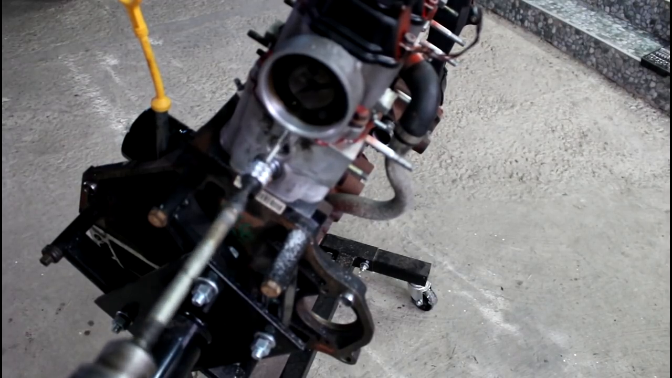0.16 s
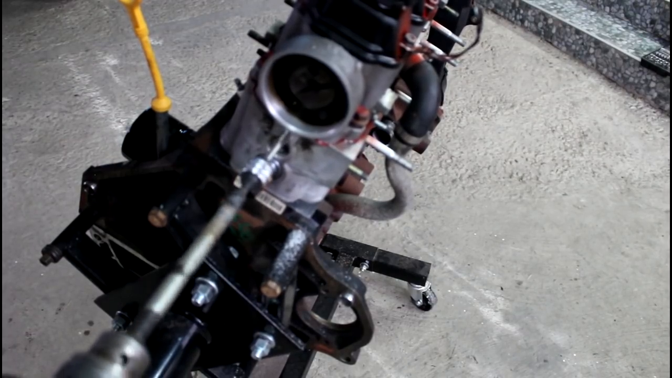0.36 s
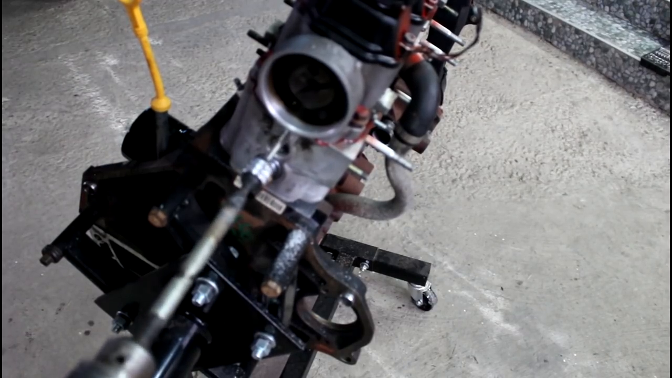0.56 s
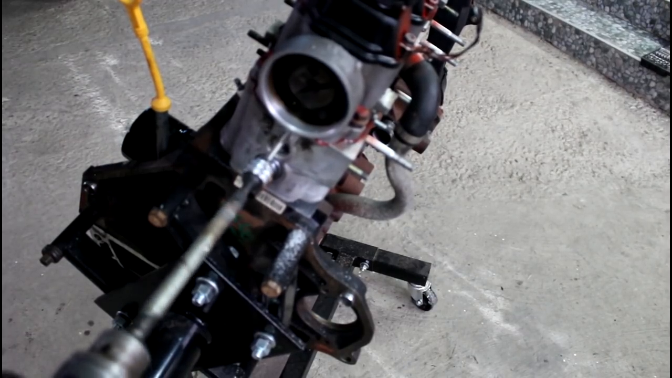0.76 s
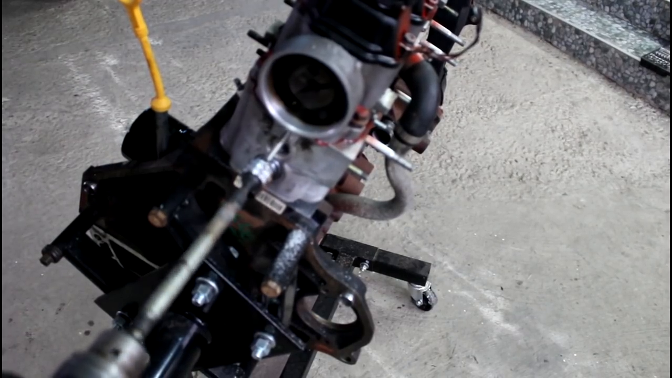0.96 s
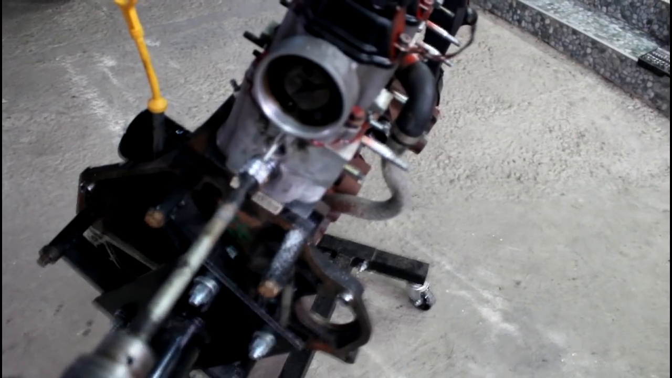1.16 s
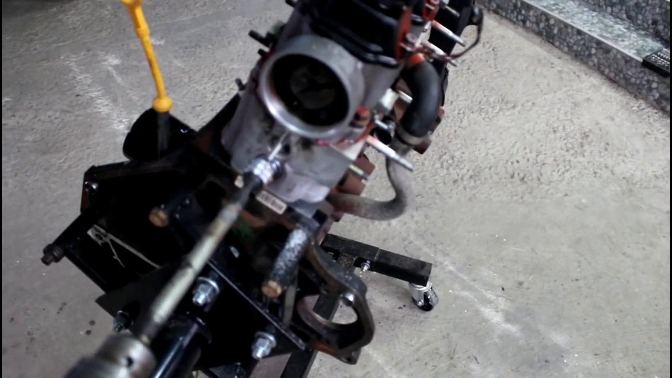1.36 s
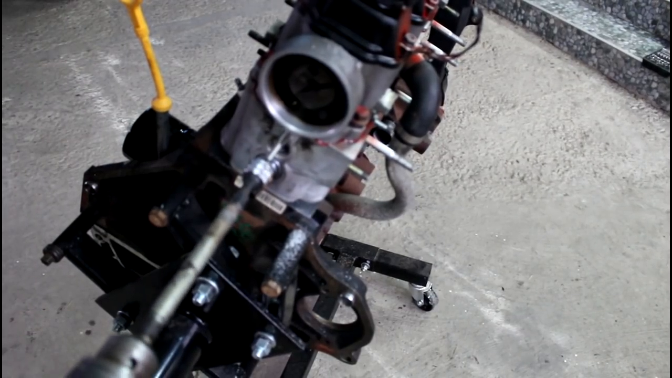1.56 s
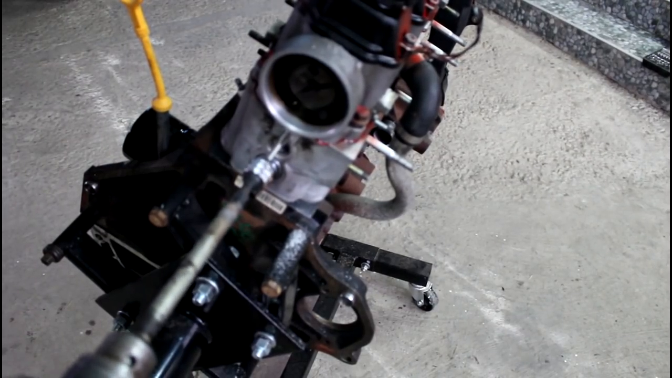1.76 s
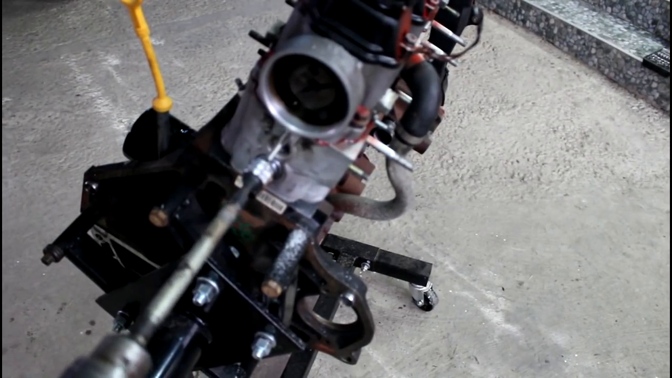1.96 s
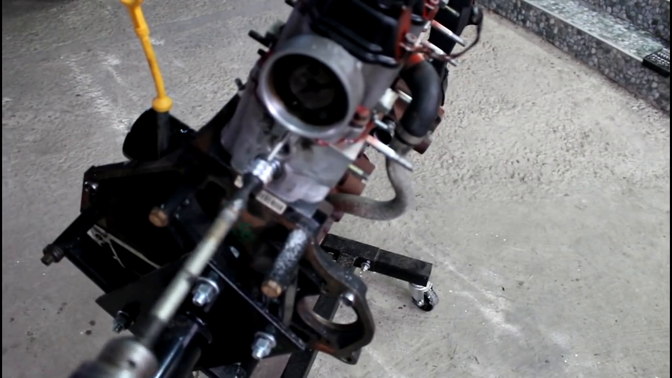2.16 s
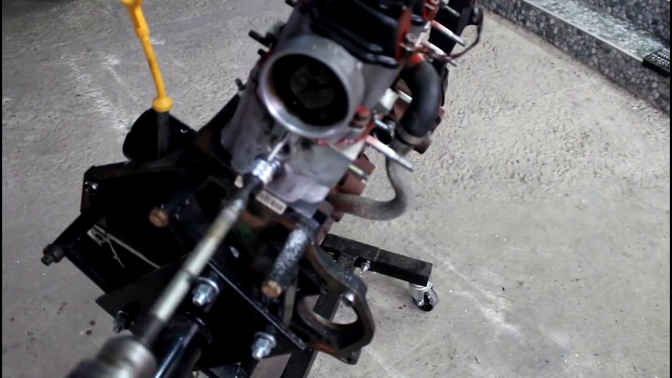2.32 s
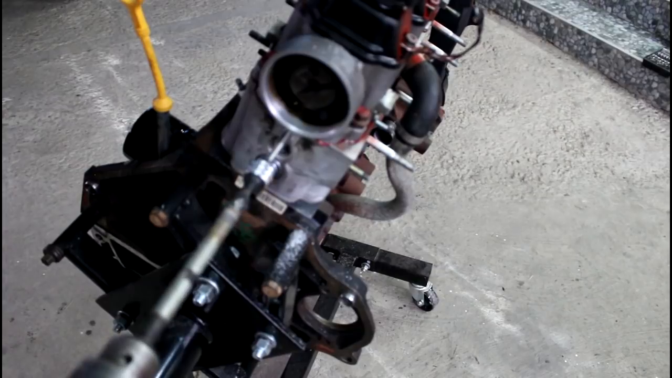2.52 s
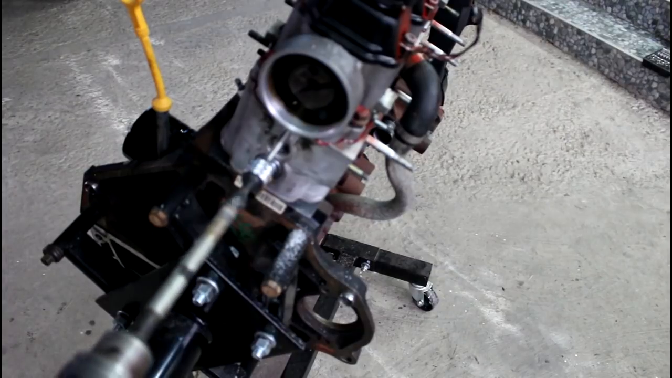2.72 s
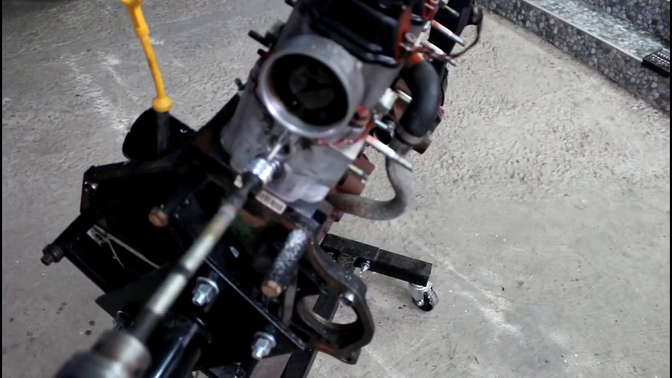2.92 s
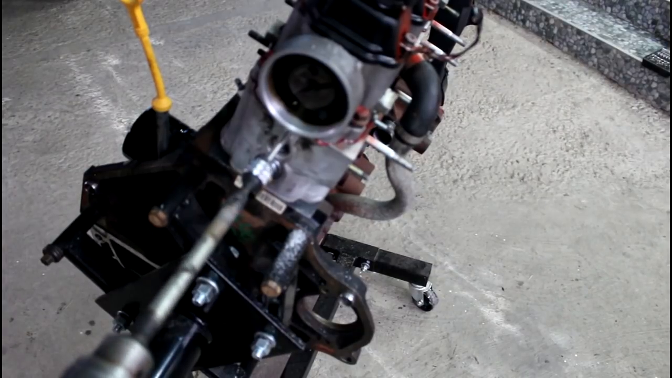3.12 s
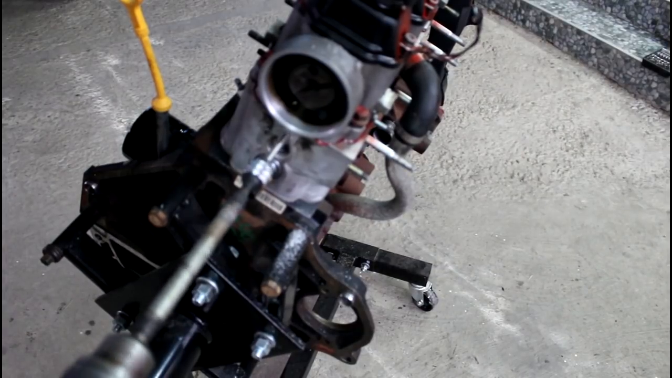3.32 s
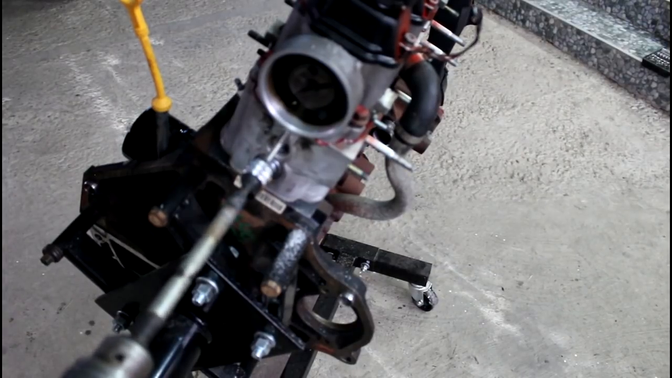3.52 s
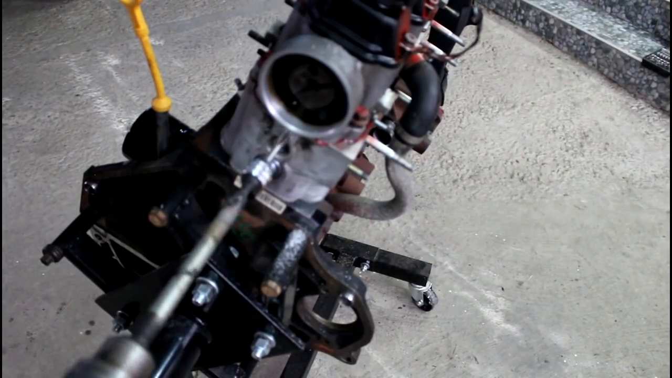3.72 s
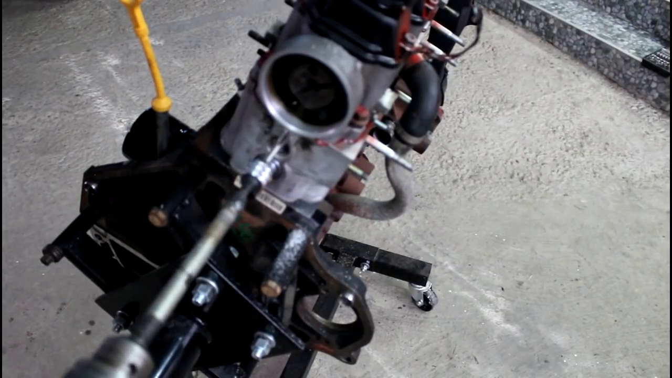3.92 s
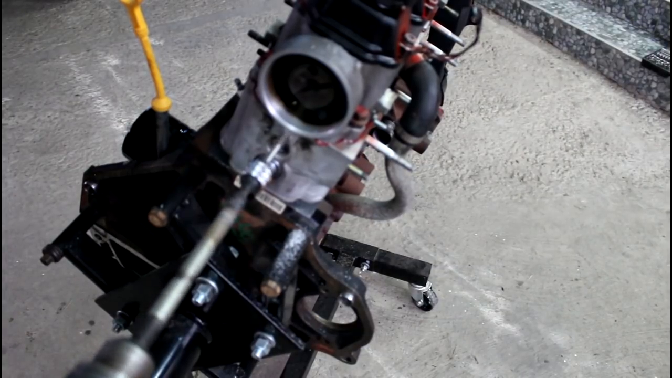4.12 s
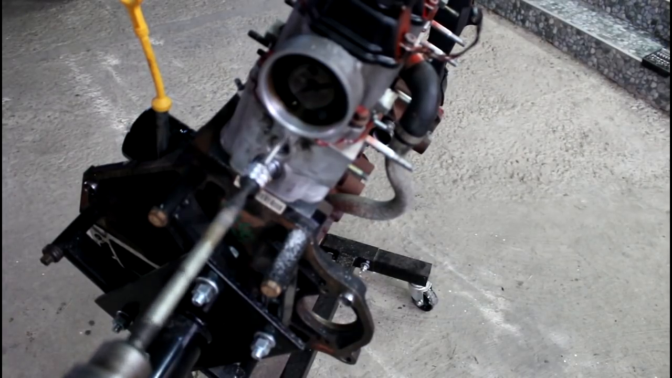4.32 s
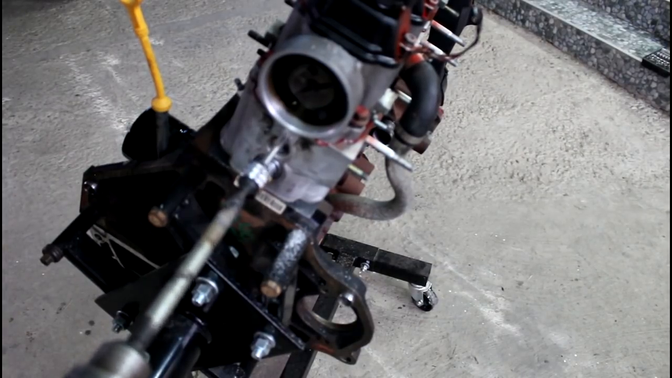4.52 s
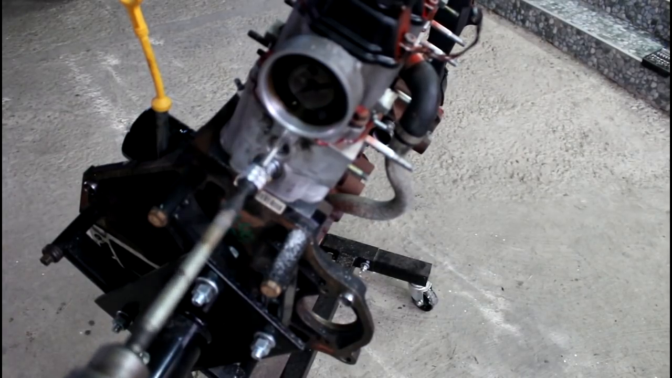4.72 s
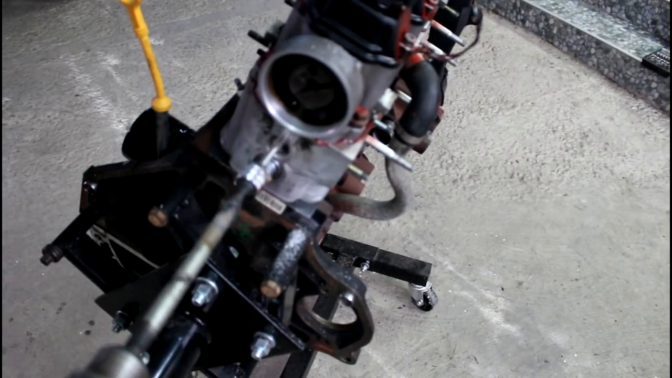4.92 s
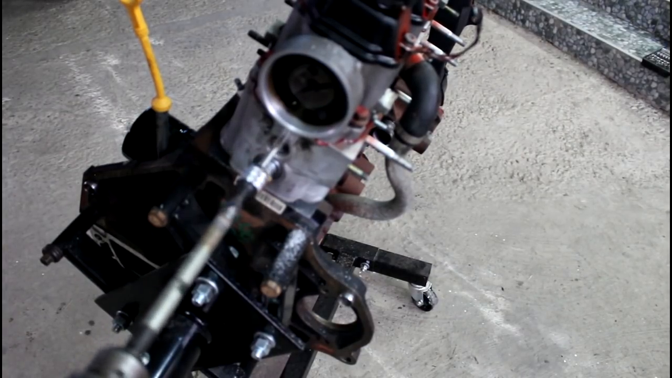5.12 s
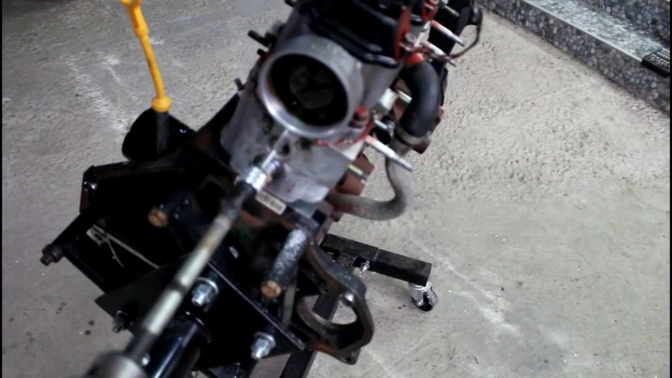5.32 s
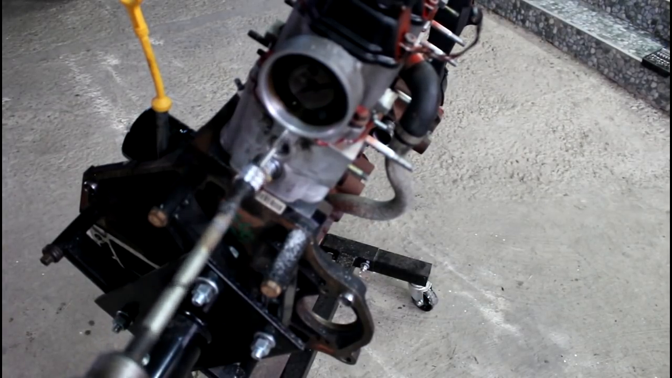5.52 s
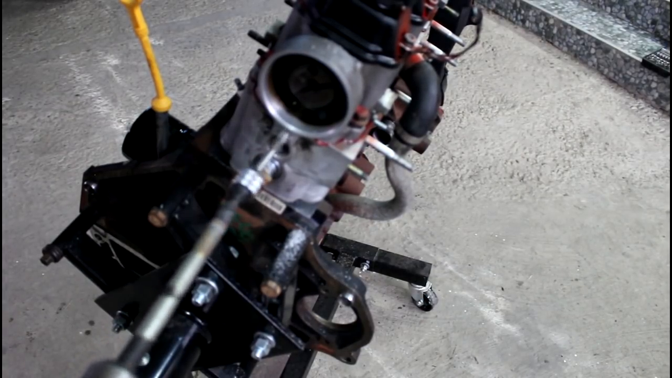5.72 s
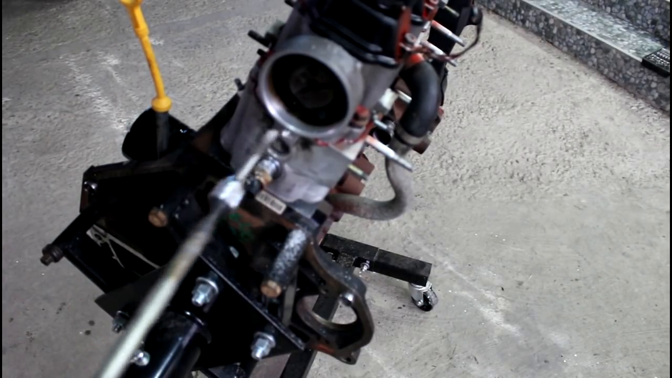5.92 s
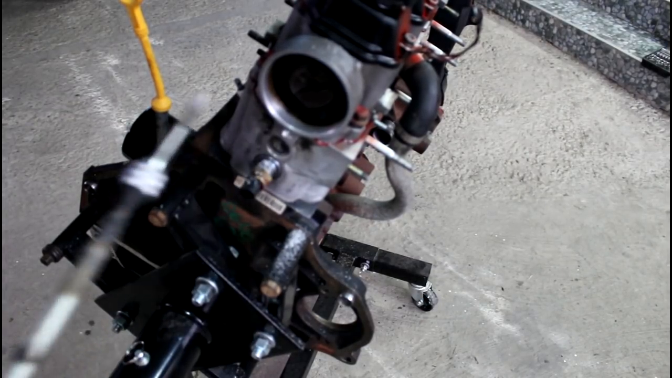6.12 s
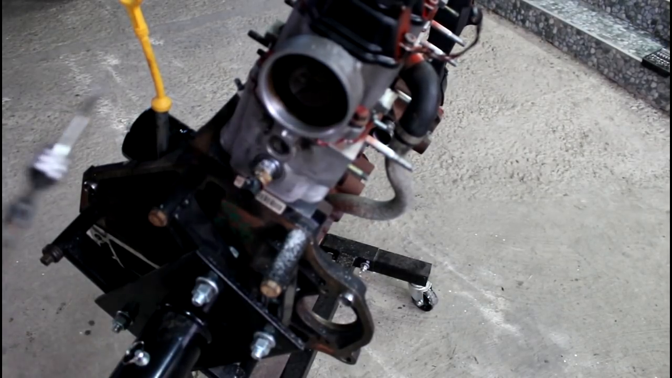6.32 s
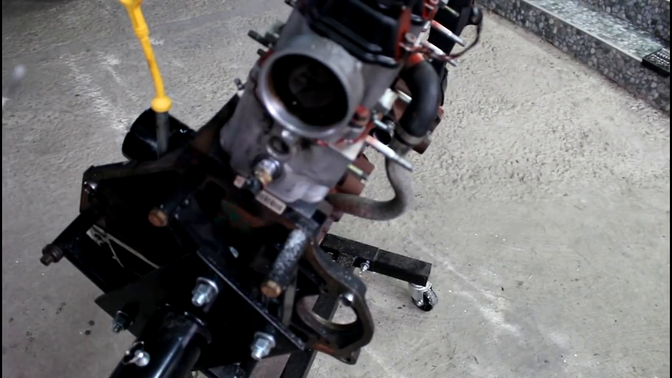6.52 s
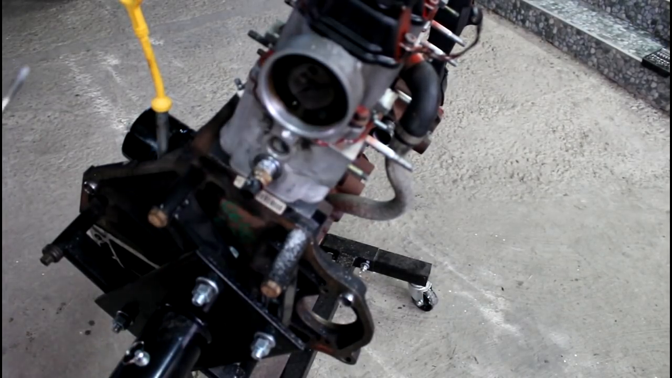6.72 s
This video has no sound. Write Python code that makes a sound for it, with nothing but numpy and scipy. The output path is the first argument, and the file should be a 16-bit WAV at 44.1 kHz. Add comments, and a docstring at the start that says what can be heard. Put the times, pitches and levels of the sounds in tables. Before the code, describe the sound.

Stuttering drill pulls rattle, scrape and clank against metal in an echoing workshop, ending in two long whining run-downs over faint low hum.

```python
"""Power drill driving a tap

A power drill runs a tap into an engine casting through a long socket extension, over a concrete workshop floor.
Most pulls of the trigger take up the slack with a knock; the motor then spins up and runs down again.
Timed clicks and friction noise make the rattle and scrape, multiples of the beat rate make the whine.
Short loaded bursts give way to longer free runs. Struck metal rings, and a low hum wanders behind it all.
"""
import sys
import numpy as np
from scipy import signal
from scipy.fft import rfft, irfft, next_fast_len
from scipy.io import wavfile
from scipy.ndimage import uniform_filter1d

SR = 44100
rng = np.random.default_rng(int(sys.argv[2]) if len(sys.argv) > 2 else 0)


def dump(signal):
    """Clip the signal to [-1, 1] and save it as 16-bit WAV at the path in sys.argv[1]."""
    limited = np.clip(np.atleast_2d(signal).T, -1, 1)
    pcm = np.round(limited * 32767).astype(np.int16)
    wavfile.write(sys.argv[1], SR, pcm)


N = 302947
TIME = np.arange(N) / SR

# Pulls of the trigger. Each row: start in seconds, spin-up in seconds, run-down in seconds,
# top speed in beats per second, time to half speed under drag alone in seconds,
# basic level at top speed in dB, basic growl and basic scrape in dB against the middle band.
TRIGGER_PULLS = [(-.03, .03, .13, 226, .013, -17, -1, -11), (.244, 0.12, 0.069, 760, .2, -14.5, 2.5, -18),
                 (.676, 0.041, 0.16, 313, 0.19, -17, 0, -15),
                 (.98, .033, 0.25, 216, .03, -19.5, -1.5, -9.5),
                 (2.036, .074, 0.079, 280, 0.14, -16, -2, -14),
                 (2.394, .033, 0.089, 212, .2, -20, -3, -12.5),
                 (2.794, 0.031, .18, 153, .025, -21.5, -2, -11.5),
                 (3.056, .124, 0.052, 174, .15, -20, -3.5, -10.5),
                 (3.305, .115, .21, 266, .035, -19, -6, -9.5), (3.765, 0.11, .1, 213, .12, -24, -7, -9.5),
                 (4.11, 0.17, .36, 520, .15, -19, -3.5, -9.5), (4.555, .13, .7, 395, .26, -22.5, 1.5, -10),
                 (5.51, .14, .86, 275, 0.31, -23, -2, -12)]
# Moments when the drive binds and grinds louder. Each row: centre in seconds, half width in seconds, lift in dB.
BINDS = [(.3, 0.026, 3.5), (.41, 0.0098, 4), (1.14, 0.027, 6.5), (3.58, 0.026, 9), (3.86, 0.038, 6),
         (4.175, 0.025, 6.5), (4.33, 0.014, 5), (4.46, .025, 5), (4.71, 0.048, 6.5), (5.035, .02, 8),
         (5.76, .02, 6.5), (5.98, 0.031, 3.5)]
# Rattle colour with the tap cutting. Each row: frequency in Hz, density in dB per Hz.
CUTTING_COLOUR = [(88, -82), (150, -37.5), (259, -11.5), (327, -14), (533, -1.5), (729, -3.5), (904, 4.5),
                  (1140, 2), (1690, 4), (2310, -0.5), (3540, -4.5), (5770, -14), (6880, -21.5),
                  (7890, -19.5), (15900, -50)]
# Rattle colour with the tap running free. Each row: frequency in Hz, density in dB per Hz.
RUNNING_COLOUR = [(88, -43), (150, -22.5), (354, -9.5), (439, -14), (484, -2), (612, 7), (701, -7),
                  (886, -1.5), (1470, 1.5), (2310, -1.5), (2750, -3.5), (5440, -14.5), (6620, -19),
                  (9220, -24.5), (15900, -48.5)]
# Resonances of the gear case. Each row: frequency in Hz, width in Hz, lift in dB.
CASE_RESONANCES = [(609.2, 92, -3.5), (877, 210, 6), (1460, 32, 4.5), (2724, 120, 6.5), (3398.4, 500, 6),
                   (4740, 290, 3), (6509, 662, 8), (7820, 490, 5.5), (9160, 410, 3.5)]
# How the gear case radiates the whine. Each row: frequency in Hz, relative level in dB.
WHINE_RADIATION = [(250, -30), (420, -14), (560, 0), (750, -1), (950, 1), (1100, -1), (1400, 1), (1800, -7),
                   (2700, -10), (3550, -9), (5000, -26)]
# The faster the gears turn, the more they sing. Each row: speed in beats per second,
# basic whine level in dB against the rattle.
GEAR_SINGING = [(100, -22), (180, -9), (260, -2.5), (400, 0), (500, 2), (700, 3)]
# Knocks of the socket and tap. Each row: time in seconds, relative level in dB,
# relative weight of the low band in dB, relative weight of the high band in dB.
KNOCKS = [(0.086, -13.5, -19, -24.5), (0.235, -8, -20, -20), (0.261, -6, -21, -28), (0.675, -3, -21, -21.5),
          (0.697, -7, -31, -26), (0.98, -10.5, -29, -19), (1.005, -2, -20, -24), (1.118, -8, -6, -21.5),
          (1.27, -10.5, -25, -23.5), (1.293, -17, -8, -32), (1.527, -9.5, -22, -17), (1.688, -18, -5, -7),
          (1.696, -14.5, -12, -17), (1.721, -21.5, -10, -14), (1.843, -22.5, -15, -43), (2.038, 2, -9, -18),
          (2.175, -8.5, 3, -20), (2.396, 2.5, -18, -23.5), (2.476, -2, -4, -27), (2.498, -5.5, -27, -21.5),
          (2.635, -16.5, -28, -22.5), (2.795, 2.5, 2, -24.5), (2.841, -14, -22, -22),
          (2.962, -12.5, -10, -24), (3.057, 0, -15, -20), (3.297, 3, -20, -25), (3.305, -11.5, -33, -9),
          (3.719, -3.5, -12.5, -21), (4.097, -11.5, -4, -20.5), (4.137, -3, -13, -20),
          (4.196, -0.5, -26, -32), (5.454, -28, -33, -21), (5.498, -9.5, -4.5, -19.5),
          (5.598, -5, -15, -23), (5.619, -7, -28, -25)]
# Colour of a knock. Each row: frequency in Hz, density in dB per Hz.
KNOCK_COLOUR = [(71, -74), (120, -25), (482, 2.5), (1820, 5), (3040, -3), (3580, -1.5), (4770, -9),
                (5280, -7.5), (8280, -18), (12700, -31.5), (15900, -63)]
# Blows that leave the extension shaft ringing free. Each row: time in seconds, basic level in dB.
SHAFT_CLINKS = [(1.271, -45), (1.293, -27), (5.6, -22), (5.62, -11)]
# Shaft modes. Each row: frequency in Hz, relative level in dB, 60 dB decay time in seconds.
SHAFT_MODES = [(1430, -2, .06), (1545, -3, .05), (1830, -10, .04), (3400, -13, .04)]
# The casting booms when the tap jams or stops. Each row: time in seconds, basic level in dB.
CASTING_THUDS = [(2.138, -17.5), (2.398, -8.5), (2.477, -16), (2.797, -23), (3.18, -27), (4.198, -15.5)]
# Casting modes. Each row: frequency in Hz, relative level in dB, 60 dB decay time in seconds.
CASTING_MODES = [(378, -6.5, 0.11), (485, -9, 0.046), (540, -1, .05)]
# Workshop echo. Each row: frequency in Hz, 60 dB decay time in seconds, level in dB.
ROOM_ECHO = [(150, 0.3, -50), (497, 1.2, -10.5), (1440, 1.02, -10), (4050, 0.87, -9.5), (8060, 0.9, -12.5),
             (15000, 0.42, -12)]
# Swells of the background hum. Each row: centre in seconds, half width in seconds, lift in dB.
HUM_SWELLS = [(.7, 0.072, 18), (1.45, 0.33, 14.5), (2.62, .25, 15.5), (3.8, 0.24, 11), (5.3, 0.36, 10)]
# Steady workshop tones. Each row: frequency in Hz, mean level in dB.
STEADY_TONES = [(98, -60), (229, -57)]
# Colour of the room air. Each row: frequency in Hz, density in dB per Hz.
AIR_COLOUR = [(15, -48), (25, -18), (53, -6.5), (195, -6.5), (229, -5), (262, -1.5), (326, -3), (393, -9.5),
              (427, -6), (657, -10.5), (1480, -11.5), (1740, -13.5), (2750, -18.5), (15900, -43)]

# motor: starting speed and the shapes of spin-up and braking; the rattle fades in over the attack
START_BEATS_PER_S, SPIN_UP_CURVE, BRAKE_CURVE, ATTACK_S = 60, .8, 4, .024
# level follows speed, under power and while running down
DRIVEN_DB_PER_OCTAVE, COASTING_DB_PER_OCTAVE = 2.5, 7
# above cruising speed the low growl thins out; the high scrape grows with speed throughout
CRUISE_BEATS_PER_S, GROWL_LOSS_DB_PER_OCTAVE, SCRAPE_DB_PER_OCTAVE = 191, 11.5, 2.5
# the rattle switches from cutting to running free
FREE_FROM_S = 3.28
# while the tap bites hard, the gears grind instead of singing
BITE_FROM_S, BITE_TO_S, BITE_WHINE_DB = .6, 3.25, -8
# unloaded gears sing more clearly in the run-down; a bind costs some whine per dB of lift
COASTING_WHINE_DB, BIND_WHINE_LOSS = 3, .4
# the tap leaves the casting, which stops carrying the rattle
WITHDRAWN_AT_S, WITHDRAW_FADE_S, WITHDRAWN_DB, WITHDRAWN_GROWL_DB = 6, .3, -1.5, -9.5
# the tap squeaks once in the thread; its pitch sags in Hz per second
SQUEAK_AT_S, SQUEAK_HALF_WIDTH_S, SQUEAK_HZ, SQUEAK_SAG, SQUEAK_DB = 1.298, .012, 1400, 5000, -25
# the hum sinks once in pitch; its level is the one between swells
HUM_HIGH_HZ, HUM_LOW_HZ, HUM_SINKS_AT_S, HUM_SINK_S, HUM_DB = 90, 64.2, 1.28, .115, -62
# the hum swells once in its overtones
OVERTONES_AT_S, OVERTONES_WIDTH_S, OVERTONES_DB = 1.27, .11, -42.5
AIR_DB = -43
CROSSOVER_HZ, CUTOFF_HZ = (800, 4000), 16000


def drill():
    """Rattle and whine follow the speed in pitch, strength and colour; they grind louder where the drive binds."""
    speed, force, unloaded, (growl_db, scrape_db) = trigger()
    bind_db = swelling(BINDS)
    octaves = np.log2(speed / CRUISE_BEATS_PER_S)
    withdrawn = np.clip((TIME - WITHDRAWN_AT_S) / WITHDRAW_FADE_S + .5, 0, 1)
    force = force * from_db(bind_db + WITHDRAWN_DB * withdrawn)
    thinning_db = GROWL_LOSS_DB_PER_OCTAVE * np.maximum(octaves, 0)
    growl_db = growl_db + WITHDRAWN_GROWL_DB * withdrawn - thinning_db
    scrape_db = scrape_db + SCRAPE_DB_PER_OCTAVE * octaves

    beats = speed * (1 + .006 * drift(70))
    turns = np.cumsum(beats) / SR
    cutting = rattle(turns, beats, uneven_db=5.5, slop_s=.0004, scrape=.14, scrape_s=.0011,
                     rub_db=0, stray_db=-3.5)
    cutting = coloured(cutting, CUTTING_COLOUR)
    running = rattle(turns, beats, uneven_db=0, slop_s=.00005, scrape=.25, scrape_s=.0013,
                     rub_db=-3.5, stray_db=-1)
    running = coloured(running, RUNNING_COLOUR, CASE_RESONANCES)
    contact = np.where(TIME < FREE_FROM_S, cutting, running)
    low, middle, high = (evened(part, .062) for part in split(contact))

    biting = (TIME > BITE_FROM_S) & (TIME < BITE_TO_S)
    whine_db = BITE_WHINE_DB * biting + COASTING_WHINE_DB * unloaded - BIND_WHINE_LOSS * bind_db
    singing = from_db(at_hz(GEAR_SINGING, speed) + whine_db)
    # when the gears sing, the rattle below the scrape gives way to them
    body = from_db(growl_db) * low + middle + singing * whine(turns, beats)
    body = body / np.sqrt(1 + singing ** 2)
    swarf = chips(per_s=130, level_db=-18.5, edge_hz=2200)
    return force * (body + from_db(scrape_db) * high) + np.sqrt(force) * swarf


def trigger():
    """Each pull spins the motor up; drag slows it, fast at first, and friction stops it.
    Gives speed, strength, how far the gears are unloaded (0-1) and colour over time."""
    speed = np.full(N, 1. * START_BEATS_PER_S)
    force, unloaded, colour = np.zeros(N), np.zeros(N), np.zeros((2, N))
    for start, spin_up_s, run_down_s, top, half_s, level_db, *colour_db in TRIGGER_PULLS:
        rise = np.clip((TIME - start) / spin_up_s, 0, 1)
        coast = np.clip(TIME - start - spin_up_s, 0, run_down_s)
        # both speeds are fractions: of the top speed, then of the driven speed
        driven = (START_BEATS_PER_S + (top - START_BEATS_PER_S) * rise ** SPIN_UP_CURVE) / top
        drag = np.sqrt(1 + (2 ** 2 - 1) * coast / half_s)
        friction = 1 - (coast / run_down_s) ** BRAKE_CURVE
        slowed = np.maximum(friction / drag, 1e-3)
        db = level_db + DRIVEN_DB_PER_OCTAVE * np.log2(driven) + COASTING_DB_PER_OCTAVE * np.log2(slowed)
        attack = np.minimum((TIME - start) / ATTACK_S, 1)
        # a new pull takes over from the one before
        on = TIME >= start
        speed[on] = np.maximum(top * driven * slowed, START_BEATS_PER_S / 2)[on]
        force[on] = (from_db(db) * attack)[on]
        unloaded[on] = np.minimum(coast[on] / .047, 1)
        colour[:, on] = np.array(colour_db)[:, None]
    return speed, force, unloaded, colour


def rattle(turns, beats, uneven_db, slop_s, scrape, scrape_s, rub_db, stray_db):
    """One contact per beat, early or late through backlash, each with a short scrape; loose parts tick in between."""
    at = np.flatnonzero(np.diff(np.floor(turns)) > 0)
    timing, strength = rng.standard_normal((len(at), 2)).T
    # the slop is given for 200 beats per second and shrinks as the speed rises
    late = timing * slop_s * SR * 200 / beats[at]
    clicks = np.zeros(N)
    clicks[np.clip(at + late.astype(int), 0, N - 1)] = from_db(uneven_db * np.clip(strength, -2, 2))
    stray_hits = rng.random(N) < 2 * beats / SR
    strays = stray_hits * rng.uniform(-1, 1, N) * from_db(stray_db)
    scrapes = scrape * dying(clicks + abs(strays), scrape_s)
    rub = from_db(rub_db) * np.sqrt(beats / SR)
    return strays - clicks + (scrapes + rub) * rng.standard_normal(N)


def whine(turns, beats, count=10):
    """Multiples of the beat swell as they glide through the resonant range of the case, each with a slight flutter."""
    tones = 0
    for k in range(1, count + 1):
        flutter_db = 2.5 * drift(50)
        wobble = .2 * drift(100)
        gain = from_db(at_hz(WHINE_RADIATION, k * beats) + flutter_db)
        tones = tones + gain * np.sin(2 * np.pi * k * turns + wobble)
    return evened(tones, .11)


def chips(per_s, level_db, edge_hz):
    """Swarf snaps off in tiny bright ticks while the tap cuts."""
    snaps = (rng.random(N) < per_s / SR) * rng.random(N) * (TIME < FREE_FROM_S)
    ticks = dying(snaps, .00059) * rng.standard_normal(N)
    bright = signal.butter(2, [edge_hz, 14000], "band", fs=SR, output="sos")
    return from_db(level_db) * signal.sosfilt(bright, ticks)


def knocks(chatter, rise_s, chatter_s, knock_db, low_db, high_db):
    """Steel meets steel: one sharp blow and a few milliseconds of chatter."""
    out, size, lead = np.zeros(N + SR), SR // 20, SR // 200
    age = TIME[:size]
    envelope = np.minimum(age / rise_s, 1) ** 2 * np.exp(-age / chatter_s)
    for s, level_db, thud_db, edge_db in KNOCKS:
        blow = chatter * rng.standard_normal(size) * envelope
        blow[int(rise_s * SR)] += 1
        # silence ahead leaves room for the two-way band filters
        struck = coloured(np.pad(blow, (lead, 0)), KNOCK_COLOUR)
        low, middle, high = map(rms_one, split(struck))
        hit = from_db(thud_db + low_db) * low + middle + from_db(edge_db + high_db) * high
        start = int(s * SR) - lead
        out[start:start + len(hit)] += from_db(level_db + knock_db) * rms_one(hit)
    return out[:N]


def ringing(blows, modes):
    """Each blow sets every mode ringing with a strength of its own."""
    out, age = np.zeros(N), TIME[:SR // 4]
    for s, blow_db in blows:
        start = int(s * SR)
        for hz, mode_db, t60 in modes:
            db = blow_db + mode_db + rng.normal(0, 6.5) - 60 * age / t60
            out[start:start + len(age)] += from_db(db) * np.sin(2 * np.pi * hz * age)
    # the metal radiates next to nothing below its lowest mode
    return signal.sosfilt(signal.butter(4, 290, "high", fs=SR, output="sos"), out + 1e-18)


def squeak():
    """A short stick-slip tone that sags in pitch."""
    age = TIME - SQUEAK_AT_S
    turns = SQUEAK_HZ * age - SQUEAK_SAG * age ** 2 / 2
    return from_db(SQUEAK_DB) * np.exp(-(age / SQUEAK_HALF_WIDTH_S) ** 2) * np.sin(2 * np.pi * turns)


def workshop(x, near_db, near_s):
    """Quick reflections off floor and engine, then a diffuse tail that decays at its own rate in each band."""
    age = TIME[:SR * 3 // 2]
    white, tail = rng.standard_normal(len(age)), 0
    edges = np.geomspace(100, 17000, 9)
    for low, high in zip(edges, edges[1:]):
        hz = np.sqrt(low * high)
        decay = from_db(-60 * age / at_hz(ROOM_ECHO, hz)) * np.minimum(age / .028, 1)
        band_filter = signal.butter(2, [low, high], "band", fs=SR, output="sos")
        band = signal.sosfilt(band_filter, rng.standard_normal(len(age)))
        tail = tail + band * decay / np.linalg.norm(decay) * from_db(at_hz(ROOM_ECHO, hz, axis=2))
    near = white * np.exp(-age / near_s) * (age > .003)
    near = from_db(near_db) * near / np.linalg.norm(near)
    return signal.fftconvolve(x, tail + near)[:N]


def background():
    """Room air, two faint steady tones and a low hum that sinks and swells."""
    height = (1 - np.tanh((TIME - HUM_SINKS_AT_S) / HUM_SINK_S)) / 2
    hz = HUM_LOW_HZ + (HUM_HIGH_HZ - HUM_LOW_HZ) * height
    phase = 2 * np.pi * np.cumsum(hz * (1 + .015 * drift(25.1))) / SR
    swell = from_db(OVERTONES_DB) / (1 + ((TIME - OVERTONES_AT_S) / OVERTONES_WIDTH_S) ** 2)
    overtones = swell * (np.sin(1.5 * phase + drift(40)) + .6 * np.sin(2 * phase + drift(50)))
    hum = from_db(HUM_DB + swelling(HUM_SWELLS)) * np.sin(phase) + overtones
    tones = 0
    for f, db in STEADY_TONES:
        tones = tones + from_db(db + 1.43 * drift(5.5)) * np.sin(2 * np.pi * f * TIME + drift(15))
    air = rms_one(coloured(rng.standard_normal(N), AIR_COLOUR))
    # the root of two makes the tone levels RMS levels
    return np.sqrt(2) * (hum + tones) + from_db(AIR_DB) * air


def from_db(db):
    """Decibels to gain."""
    return 10 ** (np.asarray(db) / 20)


def rms_one(x):
    """The same sound at RMS level 1."""
    return x / np.sqrt(np.mean(x ** 2) + 1e-20)


def at_hz(points, hz, axis=1):
    """One column of a table, read on a logarithmic axis."""
    points = np.array(points)
    return np.interp(np.log(hz + 1), np.log(points[:, 0]), points[:, axis])


def drift(rate):
    """Random wandering of spread 1, with a new target so many times per second."""
    return rms_one(np.interp(TIME * rate, np.arange(4096), rng.standard_normal(4096)))


def swelling(rows):
    """Bell-shaped lifts in dB, added up over time."""
    return sum(lift_db * np.exp(-((TIME - s) / width_s) ** 2) for s, width_s, lift_db in rows)


def coloured(x, spectrum, peaks=()):
    """A causal (minimum-phase) body with a broad spectrum and resonant peaks."""
    size = 2 * next_fast_len(len(x) // 2 + 2048)
    hz = np.fft.rfftfreq(size, 1 / SR)
    db = at_hz(spectrum, hz)
    for f, width, lift in peaks:
        db = db + lift / (1 + (2 * (hz - f) / width) ** 2)
    # folding the cepstrum forward in time gives the minimum phase
    cepstrum = irfft(np.log(from_db(db)))
    cepstrum[1:size // 2] *= 2
    cepstrum[size // 2 + 1:] = 0
    return irfft(rfft(x, size) * np.exp(rfft(cepstrum)))[:len(x)]


def split(x):
    """Low, middle and high parts that add up to x."""
    low, below = (signal.sosfiltfilt(signal.butter(4, edge, fs=SR, output="sos"), x) for edge in CROSSOVER_HZ)
    return low, below - low, x - below


def evened(x, seconds):
    """Level 1 over the given time, with the finer grain kept."""
    size = int(seconds * SR / 2) + 1
    power = uniform_filter1d(uniform_filter1d(x * x, size), size)
    return x / np.sqrt(np.abs(power) + 1e-12)


def dying(x, seconds):
    """Each click becomes an exponential tail."""
    return signal.lfilter([1], [1, -np.exp(-1 / (seconds * SR))], x + 1e-18)


def scene():
    """Drive, knocks and ringing metal sound in the workshop, over its background."""
    work = drill() + knocks(chatter=.51, rise_s=.002, chatter_s=.0027, knock_db=-21.5, low_db=4, high_db=12.5)
    work = work + ringing(SHAFT_CLINKS, SHAFT_MODES) + ringing(CASTING_THUDS, CASTING_MODES) + squeak()
    return (work + workshop(work, near_db=-18, near_s=.011) + background())[None]


def record(dry):
    """The loudest peaks are rounded and the top is cut."""
    rounded = 1.2 * np.tanh(dry / 1.2)
    return signal.sosfilt(signal.ellip(10, .1, 80, CUTOFF_HZ, fs=SR, output="sos"), rounded)


dry = scene()
out = record(dry)
dump(out)
```